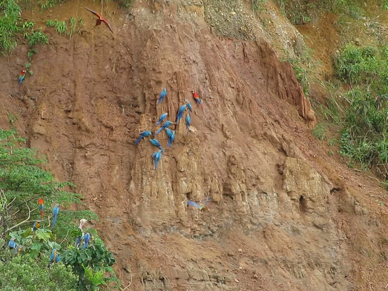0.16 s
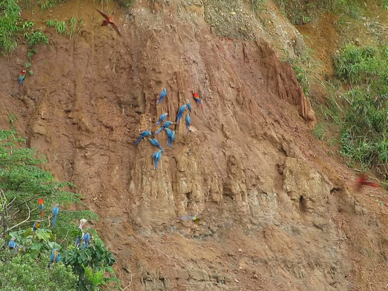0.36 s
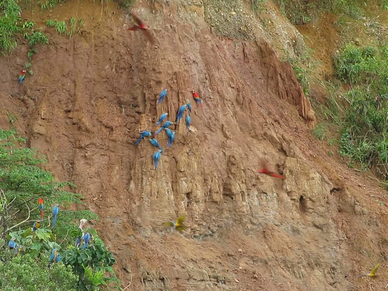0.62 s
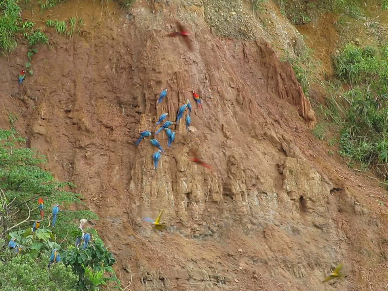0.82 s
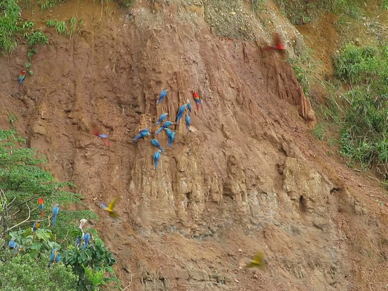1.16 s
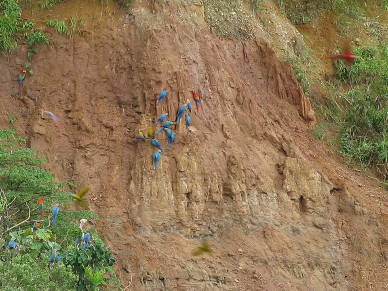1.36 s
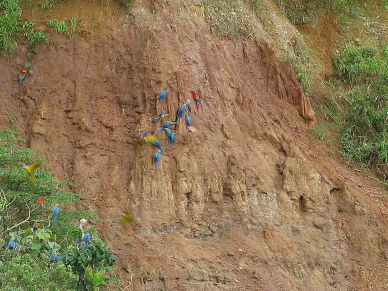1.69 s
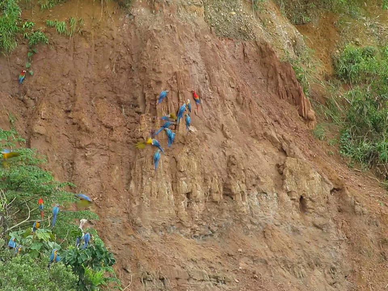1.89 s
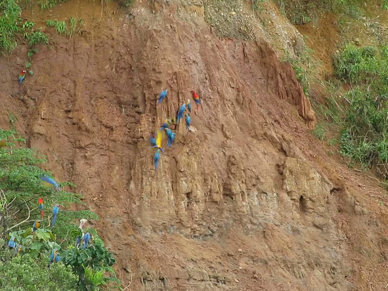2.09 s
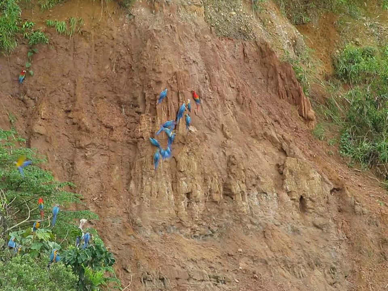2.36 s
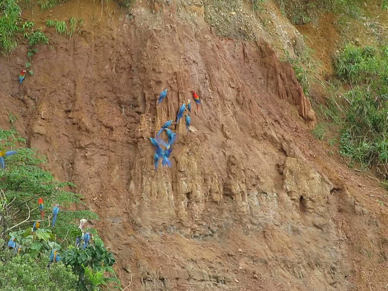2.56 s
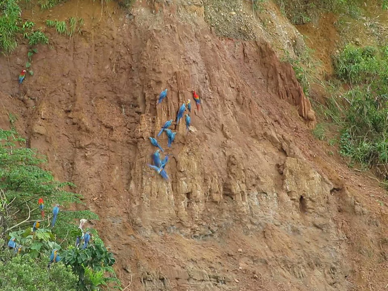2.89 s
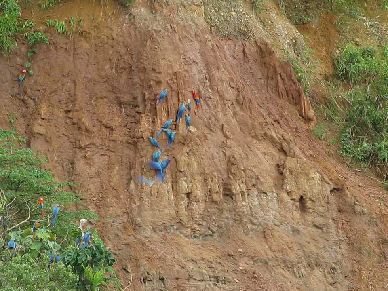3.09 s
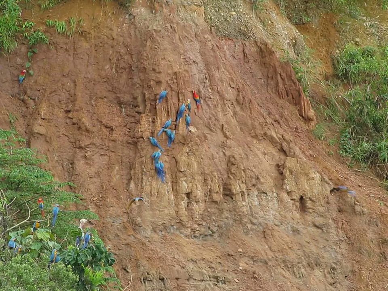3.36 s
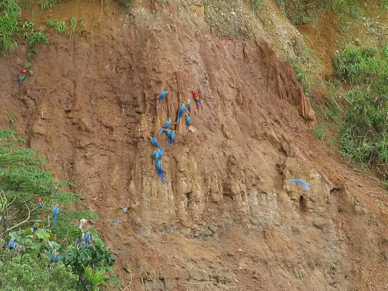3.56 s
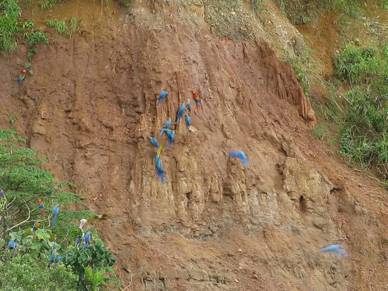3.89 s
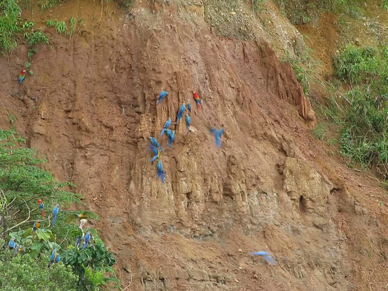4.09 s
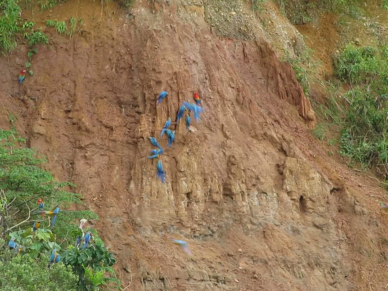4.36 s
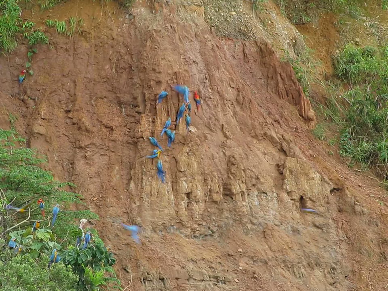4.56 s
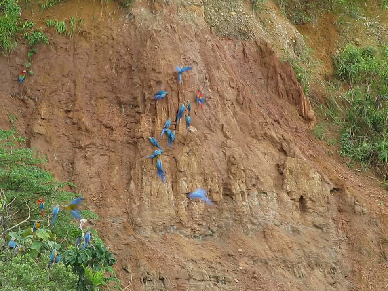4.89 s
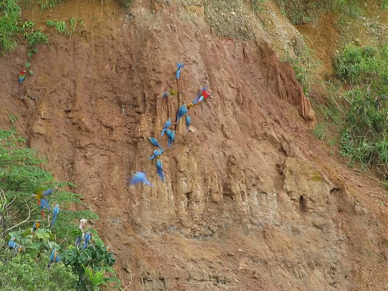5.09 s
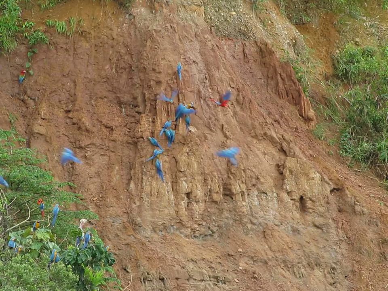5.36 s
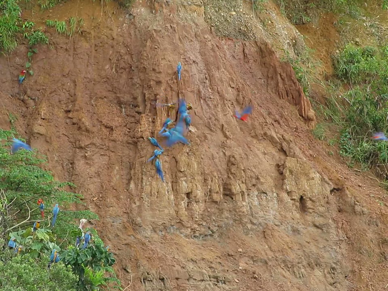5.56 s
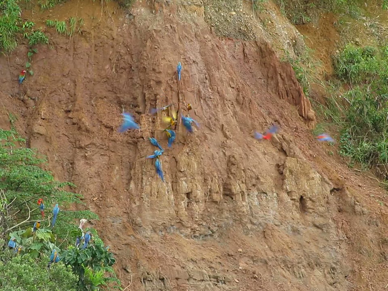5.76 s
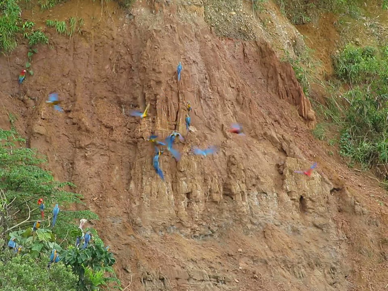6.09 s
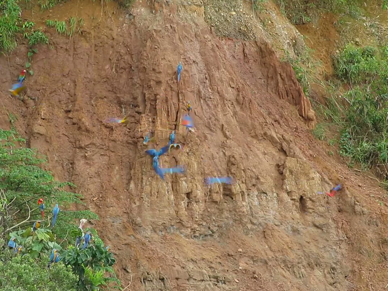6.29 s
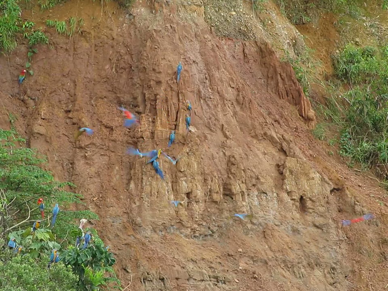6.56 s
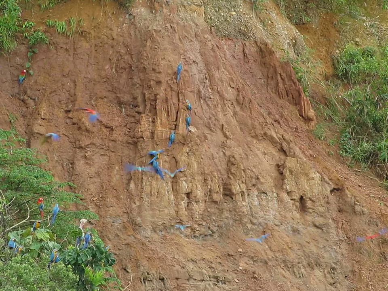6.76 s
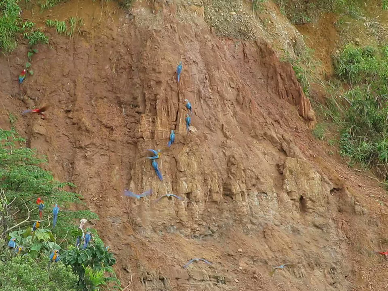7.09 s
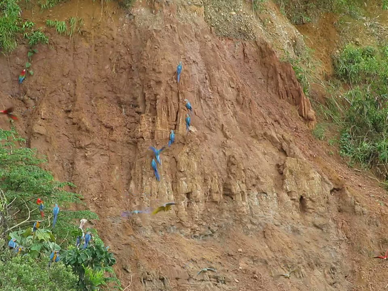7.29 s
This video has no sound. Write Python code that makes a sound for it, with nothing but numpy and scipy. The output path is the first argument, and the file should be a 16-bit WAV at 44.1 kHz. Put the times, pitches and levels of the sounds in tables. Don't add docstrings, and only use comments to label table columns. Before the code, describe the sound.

A rainforest macaw flock rasps and screeches across a river, loudest around 0.7 and 4 seconds, with shrill insects whining constantly underneath.

```python
import sys
import numpy as np
from scipy import signal
from scipy.fft import rfft, irfft
from scipy.io import wavfile

SR = 44100
rng = np.random.default_rng(int(sys.argv[2]) if len(sys.argv) > 2 else 0)


def persist_wave(psi):
    counts = np.round(np.clip(psi, -1, 1) * 32767).astype(np.int16)
    wavfile.write(sys.argv[1], SR, np.atleast_2d(counts).T)


def gain_from_db(level_db):
    decades = np.asarray(level_db, float) / 20
    return 10 ** decades


N = 328104

# f/Hz, density level/dB
FOREST_SPECTRUM = [(15, -52), (25, -18), (497, -16), (785, -9), (851, -14), (1500, -7), (1960, -13.5),
                   (3180, -11), (5030, -13.5), (7340, -2.5), (8400, -41), (11600, -15), (15600, -24)]
FOREST_DB = -51

# t/s, peak level/dB, f/Hz, overtone level/dB
SHELL_TAPS = [(1.246, -47, 373, 7), (1.428, -52, 550, -10), (1.485, -55, 537, 10), (1.574, -50.5, 420, -7),
              (1.608, -56.5, 303, -2), (1.677, -72, 475, 22), (1.726, -54, 390, -3), (1.772, -56, 505, -1),
              (1.805, -56, 487, 3), (1.84, -54, 420, -6), (3.429, -44.5, 273, -6), (7.412, -60, 275, 4)]

# t/s, level/dB
CICADA_LEVEL = [(0.0, -47), (4.14, -47), (4.81, -49), (5.12, -47.5), (7.44, -47.5)]
# f/Hz, width/Hz, level/dB
CICADA_DRUM_MODES = [(6050, 630, -4), (7100, 910, -46), (7420, 470, 6.5)]
CICADA_STROKE_HZ, CICADA_EVEN_DB = 79.27, -10
# start t/s, hold/s, level/dB
KATYDID_SWELLS = [(.08, 0.14, -42.5), (.39, 0.033, -48.5), (.64, 0.25, -44), (1.3, 0.21, -44.5),
                  (1.86, 0.26, -45), (2.31, 0.092, -49.5), (2.6, 0.28, -46.5), (3.38, 0.26, -45),
                  (3.9, 0.05, -49.5), (4.16, 0.17, -44.5), (4.47, 0.046, -49), (4.99, 0.084, -49),
                  (5.2, 0.17, -45), (5.56, 0.077, -49.5), (6.1, 0.13, -45), (6.83, 0.067, -50.5),
                  (7.2, .12, -57.5)]
# f/Hz, width/Hz, level/dB
KATYDID_WING_MODES = [(9350, 1300, -9), (11700, 1400, 0), (8500, 900, -14), (14000, 1200, -6),
                      (15000, 900, -10)]
WING_RISE_DB_S, WING_FALL_DB_S, WING_REST_DB = 89, 110, -61
# t/s, level/dB
LOW_KATYDID_CHIRPS = [(1.62, -51.5), (2.55, -51), (3.0, -54), (4.68, -53), (5.84, -52), (6.48, -54.5),
                      (7.09, -54.5)]

# t/s, f/Hz, level/dB
RISING_WHISTLE = [(1.76, 1900, -57), (1.86, 2050, -54), (1.93, 2550, -53), (1.98, 3000, -53),
                  (2.03, 3200, -54)]
# t/s, f/Hz, level/dB
HIGH_WHISTLES = [
    [(2.95, 3400, -60), (2.972, 3670, -59), (2.98, 3800, -84)],
    [(3.0, 3200, -67), (3.048, 3270, -43), (3.08, 3260, -64)],
    [(3.09, 3100, -66), (3.102, 3240, -68), (3.16, 3370, -69)],
]
# t/s, f/Hz, level/dB
LOW_WHISTLES = [
    [(2.98, 2620, -66), (3.0, 2673, -58), (3.04, 2663, -60)],
    [(3.07, 2640, -63), (3.082, 2504, -54), (3.13, 2450, -71)],
    [(3.13, 2420, -67), (3.154, 2547, -59), (3.18, 2440, -63)],
    [(3.19, 2880, -61), (3.204, 2470, -60), (3.26, 2390, -66)],
    [(3.41, 2430, -57), (3.426, 2640, -43), (3.44, 2720, -57)],
]
# t/s, f/Hz, level/dB
SOFT_COOS = [
    [(1.88, 1090, -64), (1.95, 1158, -56), (2.0, 1100, -60)],
    [(4.75, 1200, -58), (4.79, 1190, -54), (4.84, 1140, -55)],
]
# t/s, f/Hz, level/dB
HELD_OVERTONES = [
    [(.08, 1520, -47), (.12, 1560, -43), (.155, 1680, -42)],
    [(.432, 1620, -38), (.45, 1610, -35), (.468, 1560, -39)],
    [(.468, 1880, -40), (.49, 1650, -35), (.498, 1600, -39), (.503, 1800, -39), (.52, 1820, -42)],
    [(4.058, 2640, -36), (4.072, 2300, -31), (4.084, 1980, -32), (4.1, 2050, -41)],
    [(5.47, 2950, -46), (5.52, 2900, -44), (5.56, 2820, -46)],
    [(5.58, 900, -47), (5.62, 930, -44), (5.665, 915, -47)],
    [(5.605, 2780, -45), (5.65, 2760, -42), (5.71, 2680, -47)],
    [(6.71, 1520, -44), (6.755, 1650, -42), (6.8, 1560, -41)],
]

# start t/s, hold/s, level/dB, beak over windpipe level/dB
FAR_BURSTS = [(0., 0.12, -37, 3), (0.201, 0.24, -29.5, -0.5), (0.595, 0.21, -24.5, 7),
              (0.738, 0.049, -23.5, 7), (0.842, 0.11, -28.5, 0), (1.028, 0.091, -35, 12),
              (1.226, 0.063, -34, 2), (1.387, 0.26, -37.5, 2.5), (1.622, 0.76, -47, 15),
              (1.99, 0.12, -42, 28), (2.104, 0.24, -34.5, 6.5), (2.36, 0.33, -35, 2),
              (2.698, 0.11, -48.5, -14), (2.834, 0.11, -61, -3), (3.184, 0.076, -51.5, 4),
              (3.412, 0.15, -40.5, 19), (3.864, 0.23, -32.5, 4), (4.06, 0.053, -29, 0),
              (4.25, 0.25, -37, 1), (4.536, 0.11, -45, -2), (4.89, 0.22, -36.5, -5.5),
              (5.027, 0.21, -36, 4), (5.285, 0.16, -32, 7), (5.496, 0.19, -34.5, 0.5),
              (5.78, 0.12, -47.5, 4), (6.02, .07, -48.5, 17), (6.148, 0.088, -35.5, 2),
              (6.345, 0.31, -38, 3), (6.487, 0.072, -33, 13), (6.72, 0.14, -33.5, 6), (6.858, 0.32, -37, 5),
              (7.26, 0.19, -53.5, -1)]
# start t/s, hold/s, level/dB, throat f/Hz
DEEP_BURSTS = [(0., 0.12, -48.5, 1140), (0.233, 0.2, -42.5, 920), (0.562, 0.21, -42.5, 800),
               (.85, 0.28, -53, 960), (1.234, 0.13, -49.5, 940), (1.4, 0.33, -53, 880),
               (2.068, 0.26, -47, 1040), (2.427, 0.2, -46.5, 830), (3.448, 0.095, -48, 990),
               (3.806, 0.48, -52.5, 890), (4.299, 0.27, -56, 930), (4.847, 0.62, -45.5, 840),
               (5.313, 0.44, -46.5, 960), (6.068, 0.16, -47, 970), (6.306, 0.26, -41.5, 980),
               (6.724, 0.23, -46.5, 890), (7.025, 0.079, -44, 1220)]
CALL_RISE_DB_S, CALL_FALL_DB_S, FAR_PIPE_HZ, PIPE_HZ_PER_DB = 221, 158, 1640, 3

# f/Hz, level/dB
VOICE_SPECTRUM = [(300, -33), (500, -21), (950, -10), (1400, -3), (2500, -6), (4600, -2), (7000, -6.5),
                  (10000, -8.5), (15000, -54)]
THROB_S = .04
SQUAWK_GAP_S = .064
SMEAR_RAD, CLEAR_SMEAR_RAD = 1.1, .35

# t/s, pitch f/Hz, level/dB, windpipe f/Hz
LONG_CRY = [
    (1.99, 498, -52, 1500),
    (2.09, 505, -40, 1500),
    (2.12, 502, -41, 1600),
    (2.16, 538, -36, 2100),
    (2.205, 530, -36, 2000),
    (2.235, 508, -39, 2050),
    (2.33, 505, -39, 2050),
    (2.44, 498, -42, 2000),
    (2.5, 490, -54, 2000),
]
CRY_WIDTH_HZ, CRY_OPEN_DB = 300, -19

# first throb t/s, last throb t/s, end level/dB, pitch f/Hz, beak over windpipe level/dB
HOARSE_CALLS = [(.132, .132, -30.5, 414.4, 7), (.347, .398, -30.5, 489, 1), (.482, .482, -34, 449, -13),
                (.565, .565, -27.5, 454, 5), (1.261, 1.261, -32.5, 428.5, 28), (2.361, 2.361, -29, 398, 3),
                (2.405, 2.405, -34.5, 500, 3), (2.525, 2.525, -31, 465, 13), (2.56, 2.632, -27.5, 484, 9),
                (2.689, 2.689, -27.5, 486, 8), (2.714, 2.755, -41, 418.4, -20),
                (3.525, 3.595, -36.5, 518, 2), (4.414, 4.414, -40, 495, -2), (4.915, 4.999, -40, 493, 2),
                (5.089, 5.089, -37, 442, 14), (5.24, 5.24, -32.5, 488, -6), (5.57, 5.57, -33, 413, 1),
                (5.651, 5.685, -46, 535, 6), (6.179, 6.227, -39.5, 494, 7), (6.981, 6.981, -38, 425, -10),
                (7.01, 7.045, -33.5, 420, 7)]
HOARSE_PIPE_HZ, HOARSE_BEAK_HZ, HOARSE_SWELL_DB_S = 1660, 2630, 15

# windpipe f/Hz, beak f/Hz, late opening/Hz, beak over windpipe level/dB, swell/(dB per s)
CLEAR_THROATS = [
    (1830, 2730, 0, 10, 0),
    (1780, 2700, 0, 2, 32),
    (2700, 3800, 0, -5, 30),
    (2300, 3250, 0, -2, 10),
    (1650, 3580, 0, -5, 10),
    (1650, 2450, 0, -4, 0),
    (2350, 3350, 0, 1, 10),
    (2080, 2650, 0, -8, 10),
]
BEAK_SHIFT_HZ = [0, 250, 0, 150, 100, 0, 0, 0]
MIDCYCLE_SLAP = [.32, .14, 0, 0, .08, .3, 0, 0]
# first throb t/s, last
# throb t/s, end level/dB, first pitch f/Hz, last pitch f/Hz
NEAR_CALLS = [(.593, .634, -18, 457, 461), (.672, .711, -18, 448, 455), (4.032, 4.054, -24.5, 449, 449)]
MIDDLE_CALLS = [(.168, .168, -51, 443, 443), (.2, .28, -36, 440, 452), (.32, .32, -39, 443, 437),
                (.886, .886, -27, 433, 431), (1.383, 1.502, -30, 390, 441.7), (3.842, 3.842, -36, 370, 376),
                (3.878, 3.912, -29, 411, 415), (3.952, 3.952, -26, 431, 429),
                (3.994, 3.994, -26, 443, 444.5), (6.868, 6.907, -32, 465, 451),
                (7.077, 7.155, -34, 433, 437)]
HIGH_CALLS = [(.925, .966, -25, 460, 473), (2.683, 2.683, -26.5, 487, 487)]
THIN_CALLS = [(6.385, 6.42, -30.5, 432, 419), (6.465, 6.504, -30.5, 439, 439),
              (6.554, 6.592, -28.5, 469, 455)]
DARK_CALLS = [(5.276, 5.328, -30.5, 412, 401), (5.376, 5.414, -25.5, 427, 445.7),
              (5.446, 5.446, -29, 432, 429)]
LATE_CALLS = [(6.747, 6.783, -29, 411, 402), (6.82, 6.82, -39, 400, 400)]
OPEN_CALLS = [(.746, .783, -18.5, 478, 488)]
SHY_CALLS = [(4.277, 4.277, -39, 414, 414), (4.337, 4.36, -35, 512, 528)]
CLEAR_CALLS = [NEAR_CALLS, MIDDLE_CALLS, HIGH_CALLS, THIN_CALLS, DARK_CALLS, LATE_CALLS, OPEN_CALLS, SHY_CALLS]

CLIFF_T60_S, CLIFF_DB, CLIFF_LAG_S = .45, -9, .05
TOP_HZ = 15750


def level(x, db):
    return x * gain_from_db(db) / np.sqrt(np.mean(x ** 2))


def curve(table):
    s, *columns = np.transpose(table)
    return [np.interp(np.arange(N) / SR, s, c) for c in columns]


def colour(f, points):
    hz, db = np.transpose(points)
    return gain_from_db(np.interp(np.log(f + 1), np.log(hz), db))


def walk(rate, size=N):
    knots = rng.standard_normal(int(size * rate / SR) + 2)
    return 1.212 * np.interp(np.arange(size) * rate / SR, np.arange(len(knots)), knots)


def add(out, s, piece):
    i = int(s * SR) - len(piece) // 2 + np.arange(len(piece))
    ok = (i >= 0) & (i < N)
    out[i[ok]] += piece[ok]


def total_db(db):
    return 10 * np.log10(np.sum(gain_from_db(db) ** 2, axis=0) + 1e-18)


def bursts(table, s, rise_db_s, fall_db_s):
    start, hold, db = np.transpose(table)[:3, :, None]
    early_s = np.maximum(start - s, 0)
    late_s = np.maximum(s - start - hold, 0)
    return db - rise_db_s * early_s - fall_db_s * late_s


def ring(f, hz, width):
    return 1j * f * width / (hz ** 2 - f ** 2 + 1j * f * width)


def modes(x, table):
    f = np.arange(N // 2 + 1) * SR / N
    gain = sum(gain_from_db(db) * np.abs(ring(f, hz, width)) ** 2 for hz, width, db in table)
    return irfft(rfft(x) * gain, N)


def forest():
    f = np.arange(N // 2 + 1) * SR / N
    hiss = irfft(rfft(rng.standard_normal(N)) * colour(f, FOREST_SPECTRUM), N)
    return level(hiss, FOREST_DB + 2.5) * gain_from_db(0.15 * walk(2.5))


def taps():
    out = np.zeros(N)
    t = np.maximum(np.arange(-2000, 2000) / SR, 0)
    envelope = (1 - np.exp(-t / 0.0031)) * np.exp(-t / 0.0031)
    for s, db, hz, over_db in SHELL_TAPS:
        overtones = np.sin(2 * np.pi * 2.06 * hz * t) + 1.25 * np.sin(2 * np.pi * 3.2 * hz * t)
        shell = np.sin(2 * np.pi * hz * t) + gain_from_db(over_db - 1.0) * overtones
        add(out, s, gain_from_db(db + 15.5) * shell * envelope)
    return out


def buzz(rate_hz, sharp, steady, click_db):
    phase = 2 * np.pi * np.cumsum(rate_hz * (1 + .0015 * walk(6))) / SR
    strikes = rng.standard_normal(N) * (steady + np.exp(sharp * (np.cos(phase) - 1)))
    click = np.diff(np.exp(6000 * (np.cos(phase) - 1)), prepend=0)
    teeth = rng.standard_normal(round(SR / rate_hz))
    click = signal.fftconvolve(click, teeth)[:N]
    return level(strikes, 0) + level(click, click_db)


def cicada():
    strokes = buzz(CICADA_STROKE_HZ, sharp=0.18, steady=1.0, click_db=CICADA_EVEN_DB)
    whine = modes(strokes * gain_from_db(0.5 * walk(30)), CICADA_DRUM_MODES)
    return level(whine, 0.12) * gain_from_db(curve(CICADA_LEVEL)[0])


def katydid_db():
    s = np.arange(0, N / SR + .01, .01)
    db = total_db(bursts(KATYDID_SWELLS, s, WING_RISE_DB_S, WING_FALL_DB_S))
    return curve(np.transpose([s, np.maximum(db, WING_REST_DB)]))[0]


def katydids():
    strokes = buzz(102.09, sharp=1.5, steady=6, click_db=-7)
    near = level(modes(strokes, KATYDID_WING_MODES), 2.52) * gain_from_db(katydid_db())
    t = np.arange(N) / SR
    chirps = sum(gain_from_db(db) * np.exp(-((t - s) / 0.12) ** 2) for s, db in LOW_KATYDID_CHIRPS)
    low = level(modes(rng.standard_normal(N), [(10900, 2600, 0)]), 0.59)
    return near + low * chirps


def whistle(table):
    s, hz, db = np.transpose(table)
    t = np.arange(s[0], s[-1], 1 / SR)
    ends = np.clip(np.minimum(t - s[0], s[-1] - t) / 0.0027, 0, 1)
    hz = np.interp(t, s, hz) * (1 + 0.0036 * walk(65.0, len(t)))
    strength = np.sqrt(2) * gain_from_db(np.interp(t, s, db) + 2 * walk(66, len(t)))
    out = np.zeros(N)
    add(out, t.mean(), strength * ends * np.sin(2 * np.pi * np.cumsum(hz) / SR))
    return out


def throat_pulses(phase, hz, second, shimmer_db, breath):
    size = len(phase)
    slap = np.exp(250 * (np.cos(phase) - 1)) + second * np.exp(-250 * (np.cos(phase) + 1))
    slap = slap * gain_from_db(shimmer_db * np.clip(walk(hz, size), -3, 1.3))
    rasp = breath * rng.standard_normal(size) * (1 + np.cos(phase - 1))
    return slap - slap.mean() + rasp


def vocal_tract(f, pipe_hz, beak_hz, beak_db, open_db, width_hz):
    throat = ring(f, pipe_hz, width_hz) - gain_from_db(beak_db + 3.5) * ring(f, beak_hz, 1.53 * width_hz)
    direct = gain_from_db(open_db) + gain_from_db(-17.5) * ring(f, 4770, 1530)
    return throat + gain_from_db(max(beak_db, 0)) * direct


def near_echoes(f, smear_rad):
    lag_s, share = rng.uniform(.0002, .003, 3), rng.uniform(-.22, .22, 3)
    near = 1 + share @ np.exp(-2j * np.pi * np.outer(lag_s, f))
    return near * np.exp(1j * smear_rad * walk(SR / 30, len(f)))


def throbs(table, length_s, jitter, shimmer_db, breath, fall, glide, open_db, width_hz, smear_rad):
    out, size = np.zeros(N), 3072
    t, f = (np.arange(size) - size / 2) / SR, np.arange(size // 2 + 1) * SR / size
    voice = colour(f, VOICE_SPECTRUM)
    gaps = np.diff([row[0] for row in table], append=99)
    steps = np.diff(np.log([row[2] for row in table]), append=0)
    steps = np.where(np.roll(gaps, 1) > SQUAWK_GAP_S, glide / 3, steps * (np.abs(steps) < glide))
    for (s, db, hz, pipe_hz, beak_hz, beak_db, second), gap, step in zip(table, gaps, steps):
        last = gap > SQUAWK_GAP_S
        if last:
            bend = 1 - fall * np.clip(t / length_s + .3, 0, 3) ** 2
        else:
            bend = 1 + step * t / .04
        phase = 2 * np.pi * np.cumsum(hz * bend * (1 + jitter * walk(hz, size))) / SR
        pulses = throat_pulses(phase, hz, second, shimmer_db, breath)
        stretch = 1 + np.where(t > 0, .85, .4) * last
        swell = np.exp(-np.abs(t / (length_s * stretch)) ** 2.5)
        throat = vocal_tract(f, pipe_hz, beak_hz, beak_db, open_db, width_hz)
        air = gain_from_db(0.16 * (db + 22.5) * np.maximum(f - 3000, 0) / 1000)
        piece = irfft(rfft(pulses * swell) * throat * voice * air * near_echoes(f, smear_rad), size)
        add(out, s, piece * gain_from_db(db - 4.0) / np.sqrt(np.mean(piece ** 2) / np.mean(swell ** 2)))
    return out


def flock():
    s = np.arange(0, N / SR, 1 / 75)
    chance = rng.uniform(-1, 1, (len(s), 5)).T
    calls = bursts(FAR_BURSTS, s, CALL_RISE_DB_S, CALL_FALL_DB_S)
    db, beak_db = total_db(calls), np.transpose(FAR_BURSTS)[3, calls.argmax(axis=0)]
    lows = bursts(DEEP_BURSTS, s, CALL_RISE_DB_S, CALL_FALL_DB_S)
    deep_db, deep_hz = total_db(lows), np.transpose(DEEP_BURSTS)[3, lows.argmax(axis=0)]
    pipe_hz = FAR_PIPE_HZ + PIPE_HZ_PER_DB * (np.maximum(db, -55) + 35)
    deep = np.arange(len(s)) % 3 == 0
    throb_s = s + .006 * chance[0]
    level_db = np.where(deep, deep_db + 5.5, db - 2.5) + 2 * chance[1]
    pitch_hz = np.where(deep, 400, 455) * (1 + np.where(deep, .22, .13) * chance[2])
    throat_hz = np.where(deep, deep_hz, pipe_hz) * (1 + 0.037 * chance[3])
    beak_hz = 3000 + 600 * chance[4]
    rows = np.transpose([throb_s, level_db, pitch_hz, throat_hz, beak_hz, np.where(deep, -22, beak_db), 0 * s])
    return throbs(rows, length_s=0.021, jitter=.027, shimmer_db=4, breath=.06, fall=0, glide=0,
                  open_db=-10.5, width_hz=400, smear_rad=SMEAR_RAD)


def cry():
    hz, db, pipe_hz = curve(LONG_CRY)
    t, k = np.arange(N) / SR, np.arange(2, 8)[:, None]
    on = (t > LONG_CRY[0][0]) & (t < LONG_CRY[-1][0])
    size = on.sum()
    wavering_hz = hz * (1 + .005 * walk(60) + .008 * walk(300))
    phase = 2 * np.pi * np.cumsum(wavering_hz[on]) / SR
    width_hz = CRY_WIDTH_HZ * np.maximum(gain_from_db(2.5 * (db[on] + 39)), 1)
    gains = np.abs(ring(k * hz[on], pipe_hz[on], width_hz)) + gain_from_db(CRY_OPEN_DB) * (np.abs(k - 5.5) < 1)
    flutter = np.array([gain_from_db(2 * walk(70, size)) for _ in k])
    overtones = np.sum(gains * flutter * np.cos(k * phase), axis=0)
    out = np.zeros(N)
    out[on] = overtones * gain_from_db(db[on] + 2 + 2 * walk(45, size))
    return out


def train(first_s, last_s):
    along = np.linspace(1, 0, round((last_s - first_s) / THROB_S) + 1)[::-1]
    return first_s + along * (last_s - first_s), along


def hoarse_squawks():
    rows = []
    for first_s, last_s, db, hz, beak_db in HOARSE_CALLS:
        s = train(first_s, last_s)[0]
        c = rng.uniform(-1, 1, (len(s), 4)).T
        level_db = db + HOARSE_SWELL_DB_S * (s - last_s) + 0.25 * c[0]
        pipe_hz = HOARSE_PIPE_HZ * (1 + 0.027 * c[2])
        beak_hz = HOARSE_BEAK_HZ * (1.14 + 0.33 * c[3])
        rows += zip(s, level_db, hz * (1 + .06 * c[1]), pipe_hz, beak_hz, beak_db + 0 * s, 0 * s)
    return throbs(rows, length_s=0.0164, jitter=.026, shimmer_db=4, breath=.05, fall=0.0121, glide=0,
                  open_db=-12.5, width_hz=420, smear_rad=.8)


def clear_squawks():
    rows = []
    birds = zip(CLEAR_THROATS, BEAK_SHIFT_HZ, MIDCYCLE_SLAP, CLEAR_CALLS)
    for (pipe_hz, beak_hz, open_hz, beak_db, swell), wander_hz, second, squawks in birds:
        for first_s, last_s, db, first_hz, last_hz in squawks:
            s, along = train(first_s, last_s)
            hz = first_hz + along * (last_hz - first_hz)
            opening = open_hz * np.clip((hz - 450) / 30, 0, 1) * along
            beak = beak_hz + opening + wander_hz * rng.uniform(-1, 1, len(s))
            tuned_pipe, tuned_beak = hz * np.round(pipe_hz / hz), hz * np.round(beak / hz)
            level_db = db + swell * (s - last_s)
            rows += zip(s, level_db, hz, tuned_pipe, tuned_beak, beak_db + 0 * s, second + 0 * s)
    return throbs(sorted(rows), length_s=0.0138, jitter=0.0062, shimmer_db=1.5, breath=0.014, fall=.055,
                  glide=0.0586, open_db=-15, width_hz=370, smear_rad=CLEAR_SMEAR_RAD)


def cliff(x):
    t = np.arange(SR) / SR
    decay = np.exp(-np.log(1000) * t / CLIFF_T60_S)
    wash = rng.standard_normal(SR) * decay * np.clip(t / CLIFF_LAG_S, 0, 1)
    wash = signal.lfilter([1], [1, -.6], wash)
    return x + gain_from_db(CLIFF_DB) * signal.fftconvolve(x, wash / np.linalg.norm(wash))[:N]


def scene():
    background = forest() + taps() + cicada() + katydids()
    whistles = [RISING_WHISTLE, *HIGH_WHISTLES, *LOW_WHISTLES, *SOFT_COOS, *HELD_OVERTONES]
    notes = sum(whistle(note) for note in whistles)
    clear = clear_squawks() + cry()
    echoing = cliff(.25 * clear + hoarse_squawks() + flock() + .4 * notes)
    mono = echoing + .92 * clear + .65 * notes + background
    return np.array([mono, mono])


def roll_off(x):
    return signal.sosfilt(signal.butter(12, 15760, fs=SR, output="sos"), x)


def record(dry):
    low_pass = signal.ellip(10, .2, 80, TOP_HZ, fs=SR, output="sos")
    mix = signal.sosfilt(low_pass, dry)
    return roll_off(mix)


dry = scene()
out = record(dry)
persist_wave(out)
```